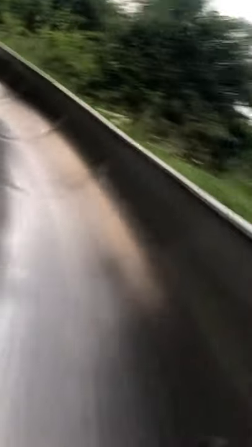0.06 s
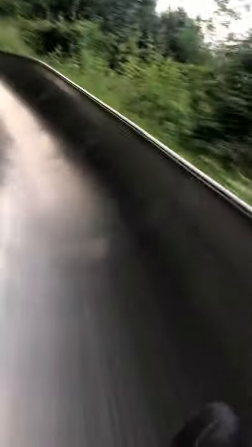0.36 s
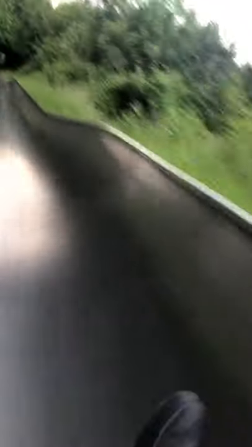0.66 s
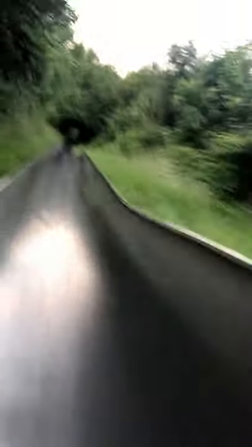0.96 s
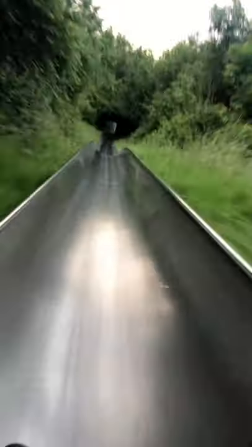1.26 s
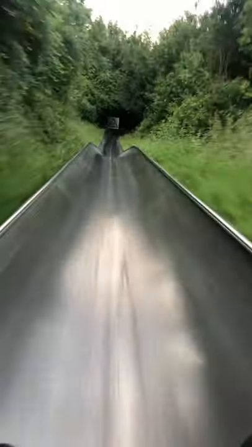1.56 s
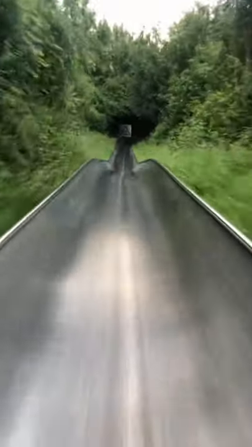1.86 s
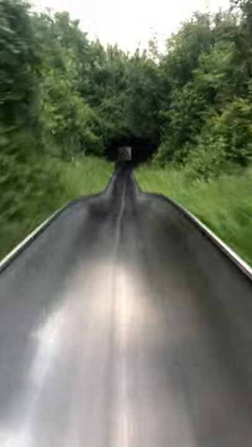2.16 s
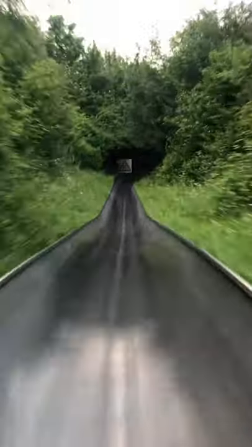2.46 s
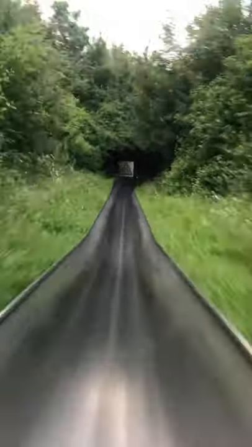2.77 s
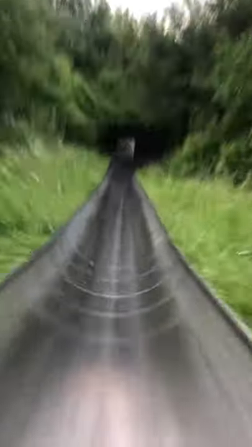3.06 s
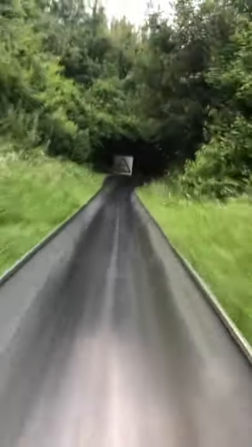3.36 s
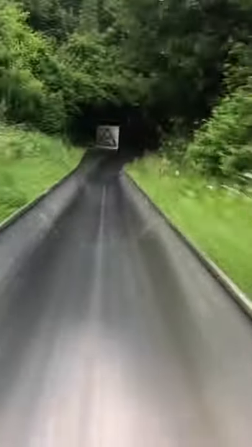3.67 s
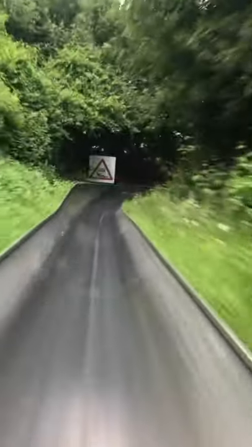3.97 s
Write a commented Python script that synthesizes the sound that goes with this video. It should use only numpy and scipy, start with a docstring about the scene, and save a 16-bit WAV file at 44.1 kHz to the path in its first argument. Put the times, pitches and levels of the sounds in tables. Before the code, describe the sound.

A sled races down an outdoor steel trough, its runners rumbling and hissing. Clattering knocks and thuds come thickly at first, ease briefly, then return harder, while wind gusts buffet the microphone at the rider's seat.

```python
"""A gust and a clatter of knocks over rumbling, hissing runners: a sled races down a curving steel trough
in the open, heard from the rider's seat. The runners rub on the sheet metal, harder in the bends,
and set it ringing. Seams and side walls knock the sled into short rattles, dips thud through
its hull, and the headwind buffets the microphone."""
import sys
import numpy as np
from scipy import signal
from scipy.fft import rfft, irfft, dct, next_fast_len
from scipy.io import wavfile
from scipy.ndimage import uniform_filter1d, minimum_filter1d

SR = 44100
rng = np.random.default_rng(int(sys.argv[2]) if len(sys.argv) > 2 else 0)


def wrap_up_sound(samples):
    """Save the sound to the file named by the first command line argument, as 16-bit audio."""
    columns = np.atleast_2d(samples).T
    # keep every value between -1 and 1, then stretch to whole-number steps
    tamed = np.clip(columns, -1, 1)
    steps = np.round(tamed * 32767).astype(np.int16)
    wavfile.write(sys.argv[1], SR, steps)


N = 176400


def from_db(db):
    """Decibels to gain."""
    return 10 ** (np.asarray(db) / 20)


def rms_one(x):
    """Scale to unit power."""
    return x / np.sqrt(np.mean(x ** 2) + 1e-20)


def automation(rows):
    """Join breakpoints by straight lines, one curve for each column after the time."""
    times_s, *columns = np.transpose(rows)
    return [np.interp(np.arange(N) / SR, times_s, column) for column in columns]


def drift(rate_hz):
    """Smooth random modulation with a spread of 1."""
    hop, settle = 40, 2000
    pole = np.exp(-2 * np.pi * rate_hz * hop / SR)
    noise = rng.standard_normal(N // hop + settle + 2)
    slow = signal.lfilter([1], [1, -2 * pole, pole * pole], noise)[settle:]
    return np.interp(np.arange(N) / hop, np.arange(len(slow)), rms_one(slow))


def coloured(x, eq):
    """Causal EQ through (freq_hz, relative_db) points; white noise keeps its power."""
    size = next_fast_len(N + SR // 2, real=True) // 2 * 2
    hz, db = np.transpose(eq)
    log_f = np.log(np.maximum(np.arange(size // 2 + 1) * SR / size, 1))
    beyond = np.maximum(np.log(hz[0]) - log_f, 0) + np.maximum(log_f - np.log(hz[-1]), 0)
    gain = from_db(np.interp(log_f, np.log(hz), db)) * np.exp(-2 * beyond)  # 12 dB/octave skirts
    cepstrum = irfft(np.log(rms_one(gain)))
    cepstrum[1:size // 2] *= 2  # fold to minimum phase
    cepstrum[size // 2 + 1:] = 0
    return irfft(rfft(x, size) * np.exp(rfft(cepstrum)))[:N]


def resonance(x, hz, width_hz):
    """One resonance with gain 1 at its peak."""
    r = np.exp(-np.pi * width_hz / SR)
    feedback = [1, -2 * r * np.cos(2 * np.pi * hz / SR), r * r]
    return signal.lfilter(np.array([1, 0, -1]) * (1 - r * r) / 2, feedback, x)


def steep_band(x, hz, width_hz):
    """Two equal resonances in series, each width_hz wide."""
    return resonance(resonance(x, hz, width_hz), hz, width_hz)


def contacts(per_s, spread_db=0):
    """Dense tiny impacts, uneven in size by spread_db; unit power."""
    sizes = from_db(spread_db * np.minimum(rng.exponential(1, N), 4)) * rng.choice([-1, 1], N)
    return rms_one(sizes * (rng.random(N) < per_s / SR))


def snap(t, decay_s):
    """Envelope with a steep rise and an exponential fall."""
    return np.sqrt(t / decay_s) * np.exp(1 - t / decay_s)


# Gusts of headwind: time_s, level_db
GUSTS = [(0,-26),(.47,-43.5),(.83,-32.5),(1.05,-44),(1.3,-50),(2.4,-41),(2.58,-26),(2.8,-38),(3.1,-45),(3.32,-21),(3.55,-45),(4,-36)]
# Low boom of the wind: freq_hz, relative_db
WIND_EQ = [(22, -27), (31, 6), (45, 5), (70, 3), (110, -1), (200, 3.5), (500, -31.5)]
def wind():
    """The headwind buffets the microphone in low, lumpy gusts."""
    gust_db, = automation(GUSTS)
    buffeting = rms_one(rng.standard_normal(N) * from_db(2 * drift(rate_hz=40)))
    return coloured(buffeting * from_db(gust_db + 5.5), WIND_EQ)


# Hollow resonances of the hull: pitch_hz, width_hz, level_db
HULL_MODES = [(167.7, 47.4, -28), (285, 51, -34), (350, 45, -37.5)]
def hull_drone():
    """The sliding keeps the hull humming fairly evenly, swelling a little with the rumble."""
    rumble_db, _ = automation(RUNNER_LOAD)
    out = np.zeros(N)
    for hz, width_hz, db in HULL_MODES:
        hum = rms_one(steep_band(rng.standard_normal(N), hz, 2 * width_hz))
        envelope = np.sqrt(uniform_filter1d(hum ** 2, size=1300) + 0.11)
        out += from_db(db) * rms_one(hum / envelope)
    return out * from_db(0.15 * (rumble_db - rumble_db.mean()))


# Steel singing in the bends and on the run-out: start_s, end_s, pitch_hz, level_db
SINGING_SPANS = [(0, 0.467, 4540, -46), (0, 1.173, 1620, -39.5), (.55, 0.715, 3540, -46),
                 (3.3, 4.1, 3470, -48)]
def steel_singing():
    """Narrow rings catch and drop out as the runners grip and slip."""
    t, out = np.arange(N) / SR, np.zeros(N)
    for start_s, end_s, hz, db in SINGING_SPANS:
        ring = steep_band(rng.standard_normal(N), hz, width_hz=190)
        grip = from_db(6 * np.tanh(drift(rate_hz=23)))
        soft_gate = uniform_filter1d(1.0 * ((t >= start_s) & (t < end_s)), size=4000)
        out += from_db(db) * rms_one(ring * grip) * soft_gate
    return out


def rattle():
    """Loose fittings tick finely, as hard as the runners rub."""
    _, hiss_db = automation(RUNNER_LOAD)
    ticks = contacts(per_s=170, spread_db=2.5) * from_db(hiss_db - 2.5)
    return sum(steep_band(ticks, hz, width_hz=960) for hz in (3200, 5020))


# Dips and bumps, some with a higher, hollow clunk or clank: start_s, level_db, pitch_hz
BUMPS = [(0.036, -16.5, 115), (0.098, -12, 109), (0.199, -11, 126), (0.253, -14.5, 143), (.511, -12.5, 529),
         (0.75, -8.5, 246), (.768, -10, 129), (0.983, -14, 141), (1.011, -11.5, 111), (1.236, -11.5, 145),
         (1.33, -10, 127), (2.405, -15, 136), (2.444, -8, 366), (2.48, -2, 123), (2.507, -6.5, 111),
         (2.589, -4.5, 121), (2.6395, -16, 1243), (2.684, -20.5, 1315), (2.688, -10, 335),
         (2.768, -13.5, 351), (3.2, -7, 161), (3.285, -7.5, 117), (3.325, -2.5, 121), (3.414, -9.5, 105),
         (3.689, -17, 112), (3.856, -11.5, 269)]
def thuds(rise_s=0.005):
    """Each dip or bump swings the hull through a brief, heavily damped tone."""
    out = np.zeros(N)
    for start_s, db, hz in BUMPS:
        t = np.maximum(np.arange(N) / SR - start_s, 0)
        envelope = t / rise_s * np.exp(1 - t / rise_s)
        out += from_db(db + 0.5) * envelope * np.sin(2 * np.pi * (hz * t + rng.random()))
    return out


# Hits on the sharpest joints: start_s, level_db
JOINT_HITS = [(.031,-27),(0.191,-22),(0.516,-17.5),(0.771,-24),(.978,-19.5),(1.2262,-18.5),(1.34,-26.5),(2.46,-20),(2.641,-26),(2.688,-25),(3.349,-21),(3.459,-24),(3.544,-23)]
def cracks():
    """Metal meets metal: a burst of a few milliseconds that sets the steel ringing."""
    force = np.zeros(N)
    for start_s, db in JOINT_HITS:
        t = np.maximum(np.arange(N) / SR - start_s, 0)
        force += from_db(db - 4.5) * snap(t, decay_s=0.0024)
    burst = coloured(rng.choice([-1, 1], N) * force, CLATTER_EQ)
    return burst + sum(resonance(burst, hz, width_hz=108) for hz in (3546, 4430))


def chinks():
    """Each knock scrapes one metal part into a brief ring of its own pitch."""
    t, out = np.arange(SR // 8) / SR, np.zeros(N + SR)
    for start_s, clatter_db, _, _, hz in TRACK_HITS:
        ring = rms_one(resonance(rng.standard_normal(len(t)), hz, width_hz=410))
        start = int(start_s * SR)
        out[start:start + len(t)] += from_db(clatter_db - 14.5) * ring * snap(t, decay_s=0.0084)
    return out[:N]


def strikes(levels_db):
    """The first hard touch of each knock: a single click."""
    out = np.zeros(N)
    click = np.sqrt(0.01 * SR)  # 10 ms of energy in one sample
    for (start_s, *_), db in zip(TRACK_HITS, levels_db):
        out[int((start_s + 0.003) * SR)] += from_db(db - 10.5) * click * rng.choice([-1, 1])
    return out


def knock_force(levels_db, attack_s, decay_s, tail_db=-9, tail_s=0.092):
    """Every knock builds quickly and dies away, with a weak tail as loose parts rattle on."""
    power = np.zeros(N)
    for (start_s, *_), db in zip(TRACK_HITS, levels_db):
        start = int(start_s * SR)
        t = np.arange(min(N - start, SR // 2)) / SR
        past_peak_s = np.maximum(t - attack_s, 0)
        fall = np.exp(-past_peak_s / decay_s) + from_db(tail_db) * np.exp(-past_peak_s / tail_s)
        power[start:start + len(t)] += (from_db(db) * np.minimum(t / attack_s, 1) * fall) ** 2
    return np.sqrt(power)


# Dull hull, clanging sheet and bright clatter: freq_hz, relative_db
HULL_EQ = [(70, -32), (150, 1), (240, 3), (370, 0.5), (520, -13.5), (900, -17.5)]
SHEET_EQ = [(250, -6.5), (560, 8.5), (790, 3.5), (1050, -0.5), (1600, -3.5), (2000, -11), (3500, -43)]
CLATTER_EQ = [(900, -19.5), (2000, 2.5), (3300, 3), (5000, 1.5), (6500, -3), (7500, -6), (8700, -6.5),
              (11000, -17), (15500, -37)]
# Knocks at seams and side walls: start_s, clatter_db, hull_db, sheet_db, chink_pitch_hz
TRACK_HITS = [(.031,-20.5,-16.5,-16.5,3250),(.052,-23,-36,-19,4480),(.1,-26,-36,-24,8400),(.191,-22,-25,-17.5,4430),(.257,-28.5,-22,-27,8650),(.344,-24.5,-39,-20.5,4480),(.414,-24,-15.5,-17,8500),(.511,-17,-14.5,-14,5500),(.569,-24.5,-17.5,-25,8250),(.637,-33,-13.5,-26,3520),(.658,-22.5,-15,-19,3130),(.749,-17,-10,-10,4260),(.773,-18.5,-21,-11.5,5530),(.849,-26,-16,-13,3530),(.869,-22.5,-11.5,-20,4440),(.887,-19.5,-21,-13,3760),(.969,-23,-15,-19,5230),(.978,-16,-11,-10,4540),(1.09,-27,-27,-43,4350),(1.224,-19,-15.5,-12,4840),(1.249,-25.5,-17,-34,8400),(1.327,-24,-13.5,-21,4100),(1.339,-25,-22,-32,5100),(1.614,-35,-18,-25.5,3630),(2.105,-29,-13,-35,3900),(2.406,-21.5,-16,-16,5500),(2.46,-20,-22,-27,4000),(2.487,-21,-15,-14,3420),(2.513,-17,-10.5,-12,4540),(2.536,-22,-16,-34,8750),(2.592,-37,-12,-18,8400),(2.619,-21,-26,-30,3540),(2.641,-25,-17,-13,6450),(2.687,-31,-11.5,-14.5,3500),(2.806,-27,-21,-39,7700),(2.876,-25.5,-17,-19.5,3450),(2.963,-27,-20.5,-17.5,3030),(2.984,-22.5,-13,-20,3670),(3.12,-21.5,-19.5,-20,4600),(3.176,-23.5,-21,-25,3420),(3.238,-24.5,-10,-17,8300),(3.254,-19.5,-28,-30,4740),(3.326,-19,-11,-14.5,4600),(3.348,-35,-30,-14.5,3600),(3.411,-23,-19,-18.5,4500),(3.46,-32,-26,-18.5,3570),(3.544,-25.5,-14.5,-29,3900),(3.685,-26.5,-15.5,-24,7500),(3.73,-25.5,-28,-17.5,7600)]
def knocks():
    """A hard touch and a burst of contacts sound the hull, the steel sheet and the sled's fittings."""
    _, clatter_db, hull_db, sheet_db, _ = np.transpose(TRACK_HITS)
    hull = contacts(per_s=2900) * knock_force(hull_db - 3, attack_s=0.0042, decay_s=0.018)
    hull += strikes(hull_db)
    sheet = contacts(per_s=3500, spread_db=0.46)
    sheet *= knock_force(sheet_db - 7.5, attack_s=0.00046, decay_s=0.017)
    sheet += strikes(sheet_db - 2.5)
    clatter = contacts(per_s=20000) * knock_force(clatter_db - 12, attack_s=0.0014, decay_s=0.016)
    return coloured(hull, HULL_EQ) + coloured(sheet, SHEET_EQ) + coloured(clatter, CLATTER_EQ)


def jolts(per_s=55, decay_s=0.011):
    """Small bumps in the track press the runners down for a moment each; mean 1."""
    slots_s = np.arange(0, N / SR, 1 / per_s)
    lateness, strength = rng.random((len(slots_s), 2)).T
    times_s = slots_s + lateness * 2 / per_s
    kicks = np.zeros(N)
    kicks[(times_s * SR).astype(int) % N] = strength ** 2
    pressure = signal.lfilter([1], [1, -np.exp(-1 / (decay_s * SR))], kicks + 1e-18)
    return pressure / pressure.mean()


# Low rumble, bright hiss and airy sizzle: freq_hz, relative_db
RUMBLE_EQ = [(60, -15), (110, -8.5), (165, -1), (240, -3), (340, -5), (480, -10), (780, -14.5),
             (1100, -19.5), (1600, -21), (2000, -34), (3200, -54.5)]
HISS_EQ = [(900, -25), (2000, 6), (2700, 2.5), (3600, 5), (5000, -1.5), (6500, -4.5), (8600, -10),
           (11000, -21), (15500, -31)]
SIZZLE_EQ = [(4500,5.5),(7000,4),(10000,-1),(12500,-9),(15500,-16)]
# Fine sizzle of the runners on the straight: time_s, level_db
SIZZLE_LEVELS = [(0,-53),(.75,-43.5),(1.88,-56.5),(2.0,-46),(2.65,-38.5),(2.78,-61),(3.35,-55),(4,-65)]
# How hard the runners bear on the trough: time_s, rumble_db, hiss_db
RUNNER_LOAD = [(0,-25,-39.5),(.36,-25,-36.5),(.48,-24.5,-36),(.62,-18,-31.5),(.72,-22,-35),(.79,-16.5,-34.5),(.9,-21.5,-33),(1.03,-17.5,-35.5),(1.19,-26.5,-42),(1.37,-24,-38),(1.5,-27,-41.5),(1.65,-21,-36),(1.75,-25.5,-38.5),(1.9,-27,-38),(2.2,-21.5,-40.5),(2.37,-25.5,-40),(2.48,-13,-34.5),(2.65,-20.5,-30.5),(2.78,-22,-39),(2.93,-26.5,-37),(3.24,-20.5,-35.5),(3.38,-22,-35.5),(4,-23,-37.5)]
def runners():
    """Sliding contact: the trough rumbles and the rubbing faces hiss, both shaken by the same jolts."""
    rumble_db, hiss_db = automation(RUNNER_LOAD)
    sizzle_db, = automation(SIZZLE_LEVELS)
    shake = jolts()
    rumble = contacts(per_s=4000, spread_db=1.5) * rms_one(1 + 0.14 * shake) * from_db(rumble_db - 0.5)
    wander_db = 1.4 * drift(rate_hz=13)
    hiss = rng.standard_normal(N) * rms_one(1 + 0.31 * shake) * from_db(hiss_db - 2.5 + wander_db)
    sizzle = rng.standard_normal(N) * from_db(sizzle_db)
    return coloured(rumble, RUMBLE_EQ) + coloured(hiss, HISS_EQ) + coloured(sizzle, SIZZLE_EQ)


def contact_flicker(x, depth_db=2, rate_hz=20):
    """The contact points move, so each narrow band above the hull's range flickers on its own."""
    spectrum, hz = dct(x, norm="ortho"), np.arange(N) * SR / (2 * N)
    centres_hz = np.concatenate([[450], np.geomspace(650, 12000, 26)])
    masks = [np.interp(hz, centres_hz, peak) for peak in np.eye(len(centres_hz))]
    low, *bands = [dct(spectrum * mask, type=3, norm="ortho") for mask in masks]
    return low + sum(band * rms_one(from_db(depth_db * drift(rate_hz))) for band in bands)


# Resonances of the steel: pitch_hz, width_hz, gain_db
STEEL_MODES = [(797, 9.3, -6), (1470, 240, -15), (4590, 50, -4), (5160, 48, -28), (8420, 95, -17)]
def steel_trough(x):
    """The metal adds its narrow rings to whatever rubs or strikes it."""
    return x + sum(from_db(db) * resonance(x, hz, width_hz) for hz, width_hz, db in STEEL_MODES)


def scene():
    """Sled, trough and wind, all close by, in mono."""
    sliding = contact_flicker(runners() + knocks())
    metal = steel_trough(sliding + cracks() + rattle()) + chinks() + steel_singing()
    return (metal + hull_drone() + thuds() + wind())[None]


def record(dry):
    """A low cut, a fast limiter on the peaks and a steep high cut."""
    low_cut = signal.butter(4, 48, "high", fs=SR, output="sos")
    high_cut = signal.ellip(12, 0.1, 90, 15750, fs=SR, output="sos")
    x = signal.sosfilt(low_cut, dry)
    gain = np.minimum(1, 0.92 / (np.abs(x) + 1e-9))
    gain = uniform_filter1d(minimum_filter1d(gain, size=301), size=301)  # hold and smooth over 7 ms
    return signal.sosfilt(high_cut, x * gain)


dry = scene()
out = record(dry)
wrap_up_sound(out)
```